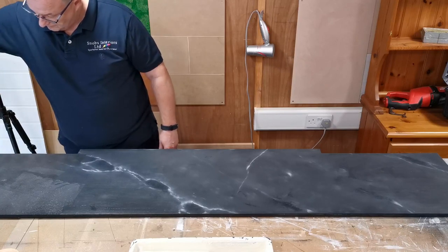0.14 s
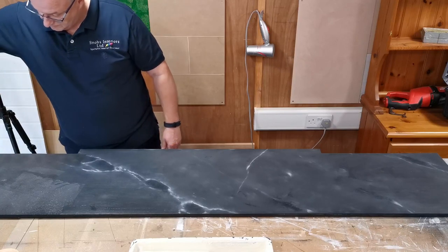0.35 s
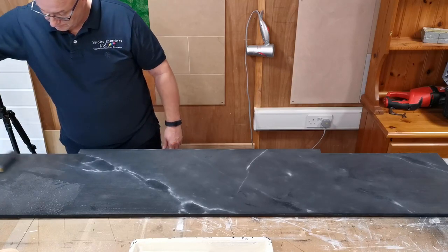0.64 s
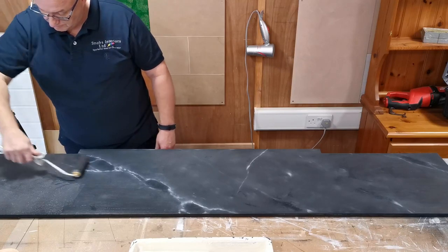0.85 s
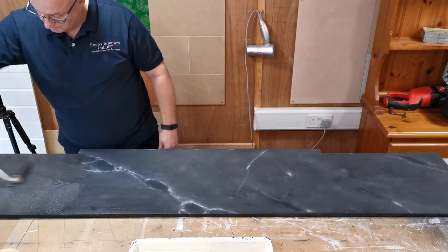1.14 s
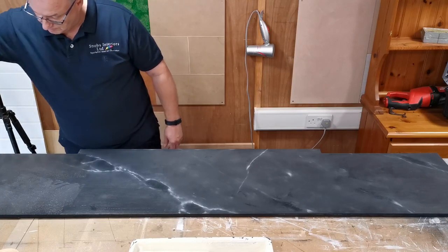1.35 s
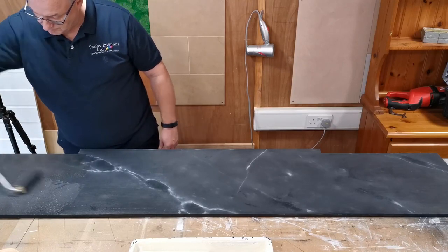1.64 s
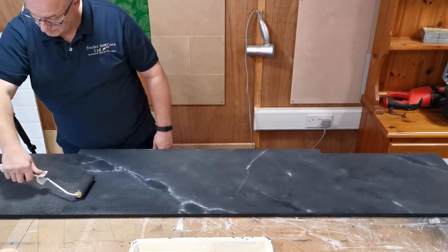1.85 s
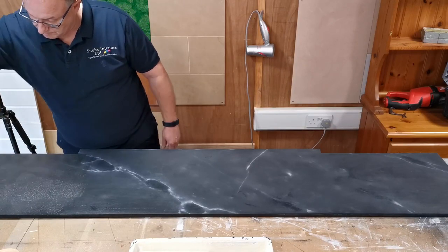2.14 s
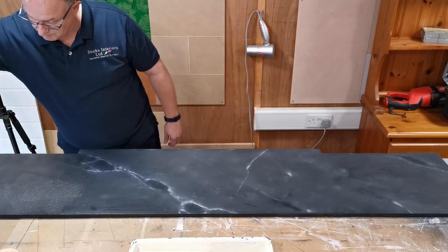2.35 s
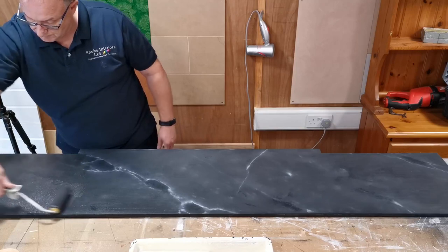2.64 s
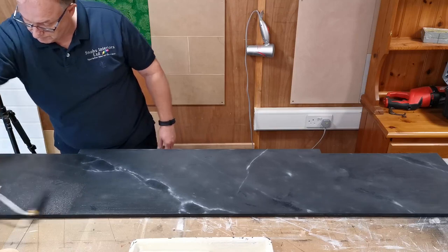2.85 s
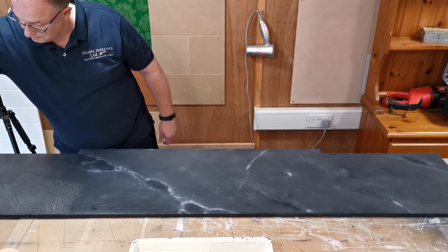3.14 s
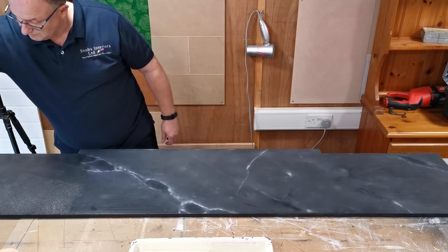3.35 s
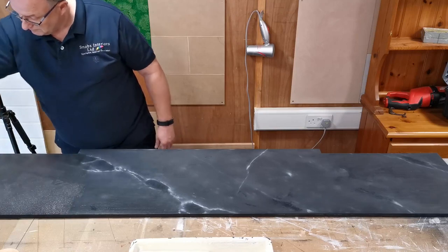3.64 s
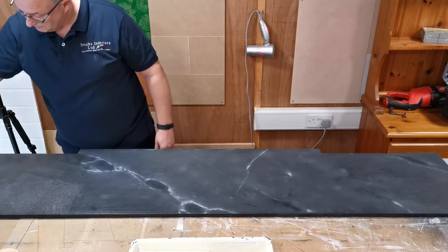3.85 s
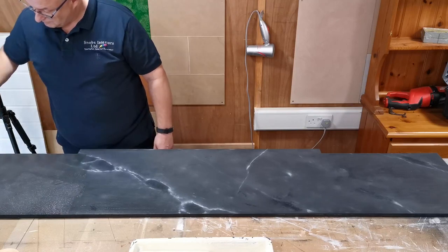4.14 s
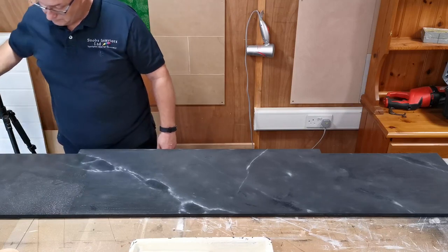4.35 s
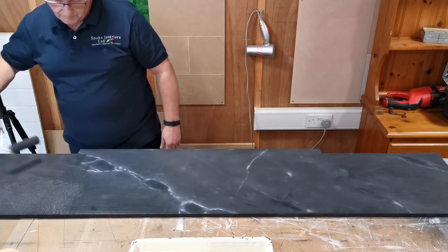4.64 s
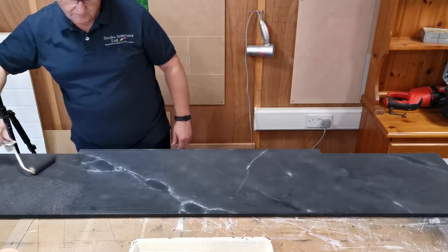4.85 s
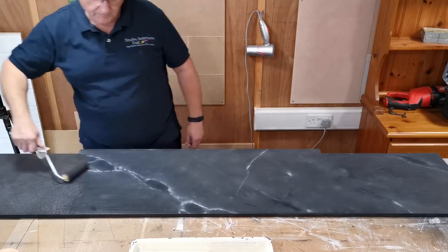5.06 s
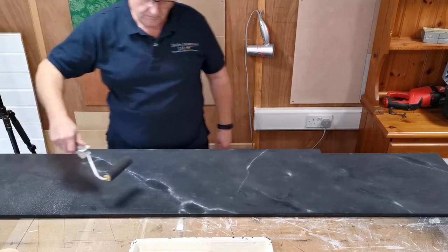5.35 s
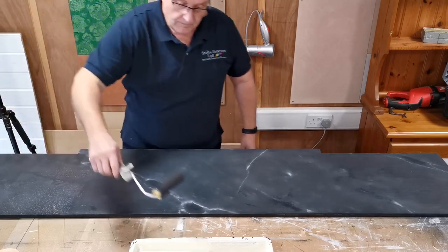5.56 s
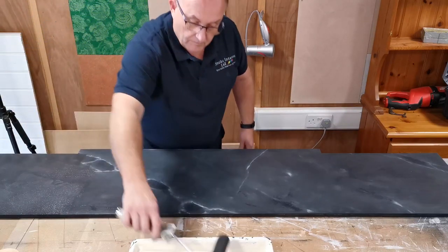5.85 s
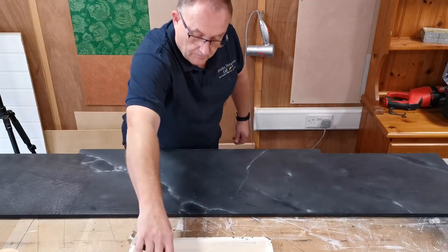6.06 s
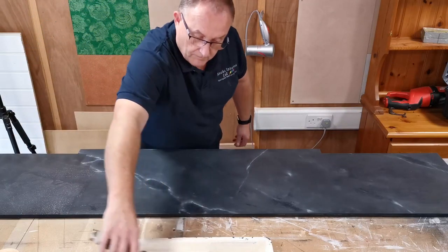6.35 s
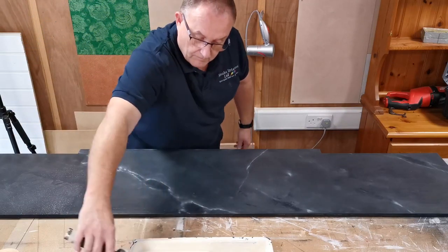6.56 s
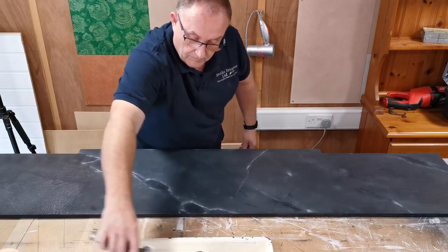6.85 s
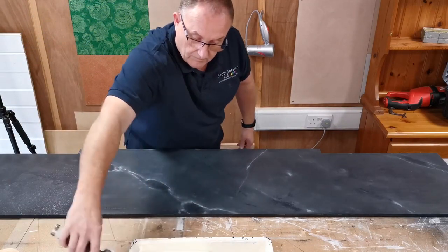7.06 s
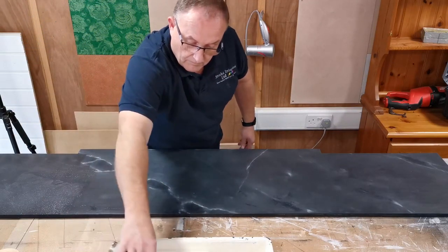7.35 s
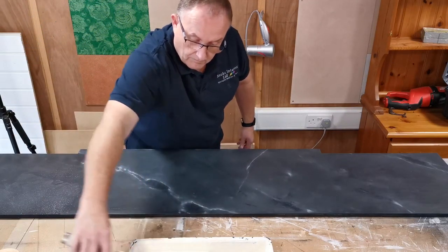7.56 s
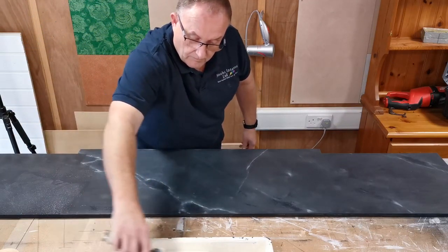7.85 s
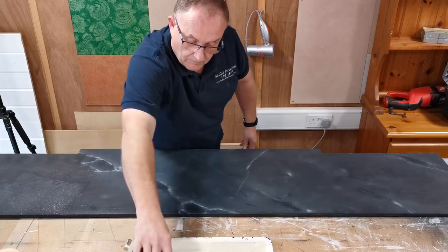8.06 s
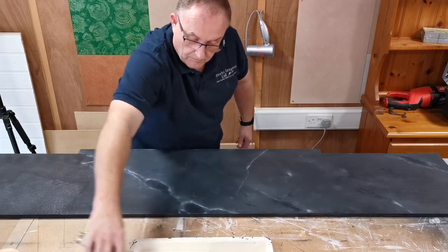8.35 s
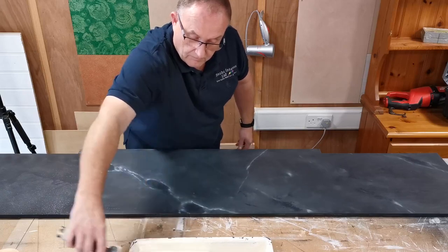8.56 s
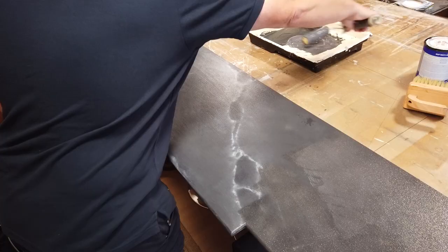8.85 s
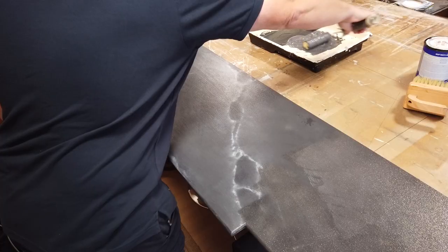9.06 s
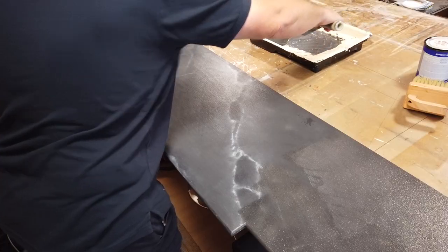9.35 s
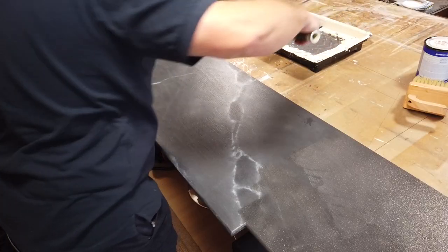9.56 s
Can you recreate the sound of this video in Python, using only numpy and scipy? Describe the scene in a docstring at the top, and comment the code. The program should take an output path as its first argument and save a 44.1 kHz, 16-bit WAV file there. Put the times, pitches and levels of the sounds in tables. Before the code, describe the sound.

Sticky, crackling roller strokes in a small workshop give way to bench thuds, hollow plastic tray knocks, and a low hum under a closer finish.

```python
"""A small foam roller runs to and fro over a board in a workshop: wet film tears as filtered random ticks.
The room hums low (noise through resonances) and the bench booms (low noise bands, decaying modes).
Later the roller is set down in a plastic tray, which scrapes (ticks) and knocks (noise cracks, struck modes).
Near the end a wavering hum starts, then a second, closer microphone takes over for the last 0.8 s:
the hum steps up, the treble peaks higher and the roller squelches (low and high tick bands)."""
import sys
import numpy as np
from scipy import signal
from scipy.fft import rfft, irfft, next_fast_len
from scipy.io import wavfile
from scipy.ndimage import uniform_filter1d

SR = 44100
rng = np.random.default_rng(int(sys.argv[2]) if len(sys.argv) > 2 else 0)


def unload_audio(sound):
    """Save the sound as a 16-bit wav file, at the path given as the first command line argument."""
    columns = np.transpose(np.atleast_2d(sound))
    # keep every value between -1 and 1, then stretch to whole-number steps
    steps = np.round(np.clip(columns, -1, 1) * 32767)
    wavfile.write(sys.argv[1], SR, steps.astype(np.int16))


N = 427329
TIME = np.arange(N) / SR
SWITCH_S = 8.893  # far microphone before, close one after
SWITCH = int(SWITCH_S * SR)
# stereo spread of diffuse room sound: hz, side_minus_mid_db
DIFFUSE_WIDTH = [(60, -12), (110, -4), (200, -22), (380, -4.5), (700, -7.5), (1290, -6), (2380, -3.5),
                 (4400, 0.5), (8120, -6.5), (15000, 5)]


def undb(db):
    """Decibels to gain."""
    return 10 ** (np.asarray(db) / 20)


def unit(x):
    """Scale to rms 1."""
    return x / np.sqrt(np.mean(x ** 2))


def colour(x, points):
    """Shape the spectrum by (hz, db) points joined on a log-frequency axis."""
    size = next_fast_len(x.shape[-1])
    hz, db = np.transpose(points)
    log_hz = np.log(np.fft.rfftfreq(size, 1 / SR) + 1)  # +1 keeps 0 Hz finite
    response = undb(np.interp(log_hz, np.log(hz), db))
    return irfft(rfft(x, size) * response, size)[..., :x.shape[-1]]


def crackle(per_second, spread_db, size):
    """Random ticks, a few larger than the rest; two rows share the ticks but not their signs."""
    chance = rng.random((4, size))
    sizes = undb(-spread_db * np.log(1 - chance[1]))
    ticks = sizes * (chance[0] < per_second / SR)
    return ticks * np.sign(chance[2:] - .5)


def walk(rate_hz):
    """Slow random wander, spread 1: noise averaged twice over 1 / rate_hz."""
    k = int(SR / rate_hz)
    return unit(uniform_filter1d(uniform_filter1d(rng.standard_normal(N), k), k))


def ring(modes, seconds):
    """Free decay of (hz, db, t60_s) modes, peak 1."""
    t = np.arange(round(seconds * SR)) / SR
    out = sum(undb(db) * np.sin(2 * np.pi * hz * t) * 1000. ** (-t / t60_s) for hz, db, t60_s in modes)
    return out / np.abs(out).max()


def struck(modes, push):
    """Modes, slightly detuned, driven by a short uneven push; peak 1."""
    detune = 1 + 0.025 * rng.standard_normal(len(modes))
    detuned = [(hz * d, db, t60_s) for (hz, db, t60_s), d in zip(modes, detune)]
    free = ring(detuned, len(push) / SR)
    out = signal.fftconvolve(free, push)[:len(free)]
    return out / np.abs(out).max()


def resonance(hz, pass_width_hz, size):
    """Noise passed twice through one resonance, rms 1."""
    b, a = signal.iirpeak(hz, hz / pass_width_hz, SR)
    once = signal.lfilter(b, a, rng.standard_normal(size))
    return unit(signal.lfilter(b, a, once))


def tail(t60_s):
    """Decaying noise of unit energy: scattered reflections."""
    t = np.arange(int(t60_s * SR)) / SR
    h = rng.standard_normal(SR)[:len(t)] * 1000. ** (-t / t60_s)
    return h / np.sqrt(np.sum(h ** 2))


def ports(pair, points, width=None):
    """Two unrelated draws become mid and side: bass is shared by the ports, treble arrives by different paths."""
    # default stereo spread: hz, side_minus_mid_db
    near_width = [(60, -24), (200, -19), (400, -15), (700, -13), (1300, -8.5), (2400, -4), (4400, 0),
                  (8000, 0), (15000, 0)]
    mid, side = unit(colour(pair, points))
    side = colour(side, near_width if width is None else width)
    return np.array([mid + side, mid - side])


def add(track, s, sound):
    """Mix a sound into a track at s seconds."""
    i = int(s * SR)
    track[..., i:i + sound.shape[-1]] += sound[..., :N - i]


def swell(peak_s, rise_s, fall_s):
    """Quarter of a cosine up to the peak and another down; returns first sample and shape."""
    i = max(int((peak_s - rise_s) * SR), 0)
    t = TIME[i:int((peak_s + fall_s) * SR)] - peak_s
    return i, np.cos(np.pi / 2 * np.where(t < 0, t / rise_s, t / fall_s))


def burst(s, attack_s, hold_s, t60_s):
    """Attack, hold and exponential release; returns first sample and shape."""
    i = int(s * SR)
    t = TIME[i:int((s + attack_s + hold_s + t60_s) * SR)] - s
    release = 1000. ** (-np.maximum(t - attack_s - hold_s, 0) / t60_s)
    return i, np.clip(t / attack_s, 0, 1) * release


def gain(shapes, levels_db, floor_db):
    """Shapes at their levels over a floor, summed as power."""
    power = np.full(N, undb(floor_db) ** 2)
    for (i, shape), db in zip(shapes, levels_db):
        power[i:i + len(shape)] += (undb(db) * shape) ** 2
    return np.sqrt(power)


def roller():
    """Paint threads snap by the thousand, louder as the roller speeds up; pressing harder adds coarser, lower tearing."""
    # spectrum of tearing paint: hz, relative_db
    film = [(350, -24.5), (600, -22.5), (840, -20), (1400, -17.5), (1600, -16), (3900, -11.5), (5000, -9),
            (6000, -5), (6700, -2), (7200, 1), (7700, -3), (8100, -9.5), (8900, -18.5), (15000, -30.5)]
    # strokes on the board, then short ones in the tray:
    # fastest_s, speeding_up_s, slowing_s, crackle_db, extra_coarse_db
    strokes = [(0.0, .1, 0.2, -37, 0), (0.26, 0.1, 0.054, -56.5, 6.5), (0.83, 0.25, 0.2, -36, 1.5),
               (1.31, 0.26, 0.21, -32, -0.5), (1.76, 0.28, .21, -33, 0.5), (2.178, 0.23, 0.25, -30.5, 0),
               (2.63, .24, 0.19, -34.5, 1.5), (3.068, .24, 0.32, -32.5, 0.5), (3.36, 0.14, 0.11, -47.5, -2),
               (4.051, .28, 0.45, -38.5, 0.5), (5.14, 0.17, 0.21, -40.5, 1.5), (5.58, 0.3, 0.29, -57, 5.5),
               (6.3, .15, 0.2, -63.5, 4), (6.53, 0.2, 0.084, -56, 4.5), (6.74, 0.16, 0.14, -55, 3),
               (7.28, 0.17, 0.22, -57, 4.5), (7.61, 0.043, 0.046, -53, 4), (7.69, 0.067, 0.062, -49.5, 4.5),
               (7.84, 0.095, 0.15, -49, 3), (8.46, 0.063, 0.16, -64.5, 9), (8.665, 0.03, 0.084, -52, 2),
               (8.76, .08, 0.095, -56.5, -4)]
    # roller pressed down, film crackles at once: start_s, attack_s, crackle_db, t60_s
    dabs = [(0.598, 0.034, -37, .3), (3.797, 0.0087, -39.5, 0.17), (4.9, 0.0078, -56.5, 1),
            (6.18, 0.007, -46.5, 0.14), (7.1, 0.0059, -44, 0.44), (7.499, 0.0098, -49.5, 0.36),
            (8.236, 0.011, -49, 0.34), (8.541, 0.0051, -47.5, 0.34)]
    dab_coarse_db = -2.5
    coarse_power = 1.12  # coarse tearing fades sooner than fine as the roller slows
    wet_film_db = -71.5  # faint ticking of fresh paint between strokes
    lift_s, lift_fade_s = 4.285, 0.011  # one stroke ends early as the roller leaves the board

    threads = crackle(7000, 1.6, size=N)
    fine = ports(threads, film) * undb(1.0 * walk(31))
    coarse = colour(fine, [(1500, 1.5), (4000, -1.5), (5500, -57)])
    lifted = np.exp(-np.maximum(TIME - lift_s, 0) / lift_fade_s)
    shapes = [swell(*row[:3]) for row in strokes]
    shapes += [burst(s, attack_s, 0, t60_s) for s, attack_s, _, t60_s in dabs]
    shapes = [(i, shape * lifted[i:i + len(shape)] if i < lift_s * SR else shape) for i, shape in shapes]
    db = np.array([row[3] for row in strokes] + [row[2] for row in dabs])
    coarse_db = np.array([row[4] for row in strokes] + [dab_coarse_db] * len(dabs))
    fine_level = gain(shapes, db, wet_film_db)
    coarse_shapes = [(i, np.abs(shape) ** coarse_power) for i, shape in shapes]
    coarse_level = gain(coarse_shapes, db + coarse_db, wet_film_db)
    # the coarse band moves from the fine level to its own
    return (TIME < SWITCH_S) * (fine_level * fine + (coarse_level - fine_level) * coarse)


def shop():
    """Soft air noise and a few low room resonances; the close microphone hears a thinner room."""
    # air noise at each microphone: hz, relative_db
    far_air = [(160, -9), (280, -4.5), (567, -4.5), (627, -3.5), (767, -5), (1270, -8.5), (1500, -9.5),
               (4180, -19.5), (7160, -27.5), (15500, -43.5)]
    close_air = [(59, -32), (100, -11.5), (219, -21.5), (543, -23.5), (847, -29), (1020, -22.5),
                 (1470, -33), (2020, -32), (2190, -32.5), (3970, -45.5), (15700, -44)]
    # room resonances: hz, width_hz (per filter pass), level_db
    room_modes = [(94, 76, -60), (167.6, 23.5, -60.5), (242.1, 16.5, -61), (290.8, 35, -67.5)]
    far_db, close_db = -58, -55.5

    air = ports(rng.standard_normal((2, N)), far_air, DIFFUSE_WIDTH) * undb(far_db + 1.0 * walk(1.3))
    mid, side = [sum(undb(db) * resonance(1. * hz, 1. * width_hz, size=N) for hz, width_hz, db in room_modes)
                 for _ in range(2)]
    out = air + mid + undb(-8.0) * side * np.array([[1], [-1]])
    out[:, SWITCH:] = ports(rng.standard_normal((2, N - SWITCH)), close_air) * undb(close_db)
    return out


def bench():
    """Thuds ring the bench's modes; bass booms and rumbles, swelling as weight shifts on bench and floor."""
    # bass swells: loudest_s, rise_s, fall_s, boom_db, deep_rumble_db
    swells = [(0.45, .25, 0.3, -58, -47.5), (0.65, 0.083, 0.12, -50, -47), (1.8, 0.37, .3, -58, -57),
              (2.72, 0.22, 0.44, -53.5, -60), (3.86, 0.09, 0.16, -41, -38.5), (5.0, .15, 0.17, -44, -54),
              (5.28, 0.29, 0.22, -39, -60), (5.75, 0.098, 0.21, -33.5, -49),
              (6.1, 0.075, 0.47, -42.5, -33.5), (6.599, 0.18, 0.33, -51, -44), (7.18, .15, 0.1, -48.5, -57),
              (8.39, 0.57, 0.19, -60.5, -51), (8.96, 0.13, .15, -53, -40), (9.18, 0.062, 0.25, -36, -33),
              (9.5, 0.32, 0.22, -42.5, -31)]
    # heavy thuds: start_s, level_db, hand_damping (divides t60), extra_upper_modes_db
    thuds = [(3.803, -13.5, 1.27, -15), (3.859, -31, 2, 5), (5.203, -30, 2.2, 4), (5.7, -27, 1, 3),
             (5.744, -19.5, 1.9, -3), (5.849, -35, 1.2, 14), (6.075, -30, 0.93, 8), (6.246, -41, 2.2, 0),
             (7.109, -16.5, 1.8, 16), (8.241, -34, 0.91, 10), (9.166, -20, 2.9, 18)]
    # bench modes: hz, relative_db, undamped_t60_s
    bench_modes = [(80.2, 5, 0.39), (62.5, -6, 0.61), (109.6, -21.5, 0.54), (177, -10, 0.16),
                   (243, -24, .1)]
    boom_hz, boom_pass_width_hz = 61.7, 37.8
    boom_floor_db, deep_floor_db = -55.5, -56  # between the swells
    lead_s = 0.0001  # bass reaches each port this far off the mean time

    out, t = np.zeros(N), np.arange(SR // 2) / SR
    for s, db, damping, upper_db in thuds:
        modes = [(hz, mode_db + upper_db * (hz > 100), t60_s / max(damping, .5))
                 for hz, mode_db, t60_s in bench_modes]
        add(out, s, undb(db) * ring(modes, .5) * (1 - np.exp(-t / 0.0049)))
    boom = resonance(boom_hz, boom_pass_width_hz, size=N) * undb(2.2 * walk(5))
    deep = unit(colour(rng.standard_normal(N), [(8, -32), (20, 4), (36, 9.5), (52, -17), (200, -61)]))
    shapes = [swell(*row[:3]) for row in swells]
    boom_db, deep_db = np.array(swells)[:, 3:].T
    out = out + gain(shapes, boom_db, boom_floor_db) * boom + gain(shapes, deep_db, deep_floor_db) * deep
    # adding the slope shifts the bass slightly in time
    return out + lead_s * SR * np.gradient(out) * np.array([[1], [-1]])


def scrape():
    """Plastic ribs of the tray stick and slip on the rough bench top."""
    # spectrum of the slips: hz, relative_db
    slip_points = [(90, -15), (160, 2.5), (300, -9), (440, -4), (620, -11.5), (1060, -11.5), (1400, -8.5),
                   (3100, -9), (4200, -16), (6000, -17), (7300, -14), (8000, -20.5), (8900, -33.5),
                   (15000, -53.5)]
    # slides: start_s, sliding_s, level_db, t60_s, brightness_db
    slides = [(3.44, 0.026, -55.5, 0.17, -8), (5.233, 0.084, -39, 0.21, 2.5), (5.5, 0.079, -53, .15, -1),
              (5.726, .03, -38.5, .3, -4), (5.795, 0.075, -26.5, 0.38, 2.5), (5.9, 0.033, -29.5, 0.34, 6),
              (6.044, 0.018, -33.5, .22, 4.5), (6.19, .1, -61.5, .2, 2), (7.387, 0.025, -49.5, 0.28, 8)]
    attack_s = 0.007

    slips = ports(crackle(6000, 2.0, size=N), slip_points) * undb(2.0 * walk(83))
    bright = colour(slips, [(2500, -18), (4500, -13), (9000, -2)])
    shapes = [burst(s, attack_s, hold_s, t60_s) for s, hold_s, _, t60_s, _ in slides]
    db, bright_db = np.array(slides)[:, [2, 4]].T
    level = gain(shapes, db, -np.inf)
    bright_level = gain(shapes, db + bright_db, -np.inf)
    return level * slips + (bright_level - level) * bright


def knocks():
    """A crack that rattles away, and the ring of the tray's body and walls."""
    # start_s, low_crack_db, high_crack_db, hollow_ring_db, wall_ring_db, rattle_t60_s
    hits = [(3.7964, -39, -44, -49, -52, 0.16), (4.3501, -28.5, -34, -63, -39, 0.13),
            (4.369, -35.5, -38.5, -60, -59, 0.24), (4.902, -46, -55, -64, -47.5, 0.38),
            (5.2048, -33, -37, -51, -54, 0.42), (5.24, -30.5, -35, -38, -50, .3),
            (5.2797, -36, -40, -57, -59, 0.51), (5.592, -47.5, -60, -41.5, -50, 0.17),
            (5.7344, -24, -25, -37, -52, 0.22), (5.7984, -15.5, -27, -45, -29, 0.22),
            (5.8057, -11.5, -40, -53, -20, 0.22), (5.8489, -29, -23, -24.5, -20, .15),
            (5.887, -7.5, -18, -49, -40, 0.096), (5.9355, -12.5, -18.5, -30, -45, .17),
            (6.047, -25, -42, -37, -35, 0.17), (6.0534, -16.5, -28, -51, -57.5, .23),
            (6.1885, -56, -45, -43, -39.5, 0.11), (7.1071, -40, -48, -22, -38, .11),
            (7.1264, -44, -54, -30, -42, 0.41), (7.503, -55, -47, -68, -50, .15),
            (7.9779, -34, -57, -52, -31, .36), (7.998, -34, -63, -64, -37.5, 0.18),
            (8.0516, -30.5, -35, -45, -43, .21), (8.2305, -37, -44, -40, -35, .29),
            (8.2381, -22.5, -42.5, -18, -19.5, 0.24), (8.54, -53, -61, -58, -46, .2),
            (8.8252, -42.5, -71, -48, -48, .3), (9.1363, -37, -40, -40, -37, 0.11),
            (9.149, -38, -40, -32.5, -40, 0.17), (9.3234, -43, -42.5, -65, -67, 0.23),
            (9.374, -39.5, -53, -60, -50, 0.49), (9.4108, -27, -40, -42, -46, 0.29),
            (9.427, -23.5, -23, -47, -48, 0.14), (9.437, -12, -21, -47, -28, 0.17),
            (9.515, -28, -41, -57, -51, 0.22)]
    # tray modes, hollow body and thin walls: nominal_hz, relative_db, t60_s
    hollow_modes = [(445, -11, 0.11), (525, -20, .07), (562, 7.5, 0.083), (610, 5.5, 0.1), (706, -6, 0.047)]
    wall_modes = [(724, 5, 0.16), (880, -39.5, 0.15), (1083, 6, 0.16), (1126, 10.5, 0.11), (1338, 0, 0.11),
                  (1525, -4, 0.081), (1895, -0.5, 0.099), (2226, -17, 0.041), (2480, -20, 0.071),
                  (3260, -25, .06)]
    # high crack at each microphone: hz, relative_db
    high_far = [(3000, -50), (4500, 6.5), (7200, 8.5), (9000, -45), (15000, -45)]
    high_close = [(3000, -38), (4500, 5), (7000, -8), (10200, 5), (12000, -2), (15700, 2)]
    contact_ms = 8.8
    crack_top_hz, top_hz_per_db = 3700, 58  # low crack reaches higher beside a strong high crack
    far_pan_db = 2  # left minus right at the far microphone

    out, t = np.zeros((2, N)), np.arange(int(.3 * SR)) / SR
    contact = 1000 * t / contact_ms
    tap = 40 * (np.arange(len(t)) == 40)
    for s, low_db, high_db, hollow_db, wall_db, t60_s in hits:
        grit = rng.standard_normal((2, len(t)))
        high = ports(grit, high_far if s < SWITCH_S else high_close)
        top_hz = max(crack_top_hz + top_hz_per_db * (high_db - low_db), 1200)
        low = ports(grit, [(350, -28), (800, 0), (top_hz, 0), (1.56 * top_hz, -16), (2 * top_hz, -40)])
        rattle = undb(low_db) * low + undb(high_db) * high
        shape = 0.052 * np.exp(-t / 0.0038) + 0.27 * 1000. ** (-t / max(t60_s, .02))
        # one firm tap in a gritty contact that builds, then eases
        push = (grit[0] + tap) * np.sqrt(contact) * np.exp(-1.5 * contact)
        tray = undb(hollow_db) * struck(hollow_modes, push) + undb(wall_db) * struck(wall_modes, push)
        tray = colour(tray, [(250, -28), (420, -0.5)])  # the tray's ring is cut below about 300 Hz
        pan_db = far_pan_db * (s < SWITCH_S)
        pan = undb(np.array([[pan_db], [-pan_db]]) / 2)
        add(out, s, (rattle * shape + 1.08 * tray) * pan)
    return out


def hum():
    """A near sine of wavering pitch and level; it starts with a brief surge and steps up, at a trough, at the switch."""
    start_s, mean_hz, far_db, close_db = 8.24, 56.9, -45.5, -31
    surge_db, surge_t60_s = -31, 0.18

    turns = np.cumsum(mean_hz * (1 + 0.019 * walk(17))) / SR
    throb = undb(2.2 * walk(30))
    fade_in = np.clip((TIME - start_s) / .03, 0, 1)
    steady = fade_in * undb(np.where(TIME < SWITCH_S, far_db, close_db))
    surge = gain([burst(start_s, 0.024, 0, surge_t60_s)], [surge_db], -np.inf)
    wave = -np.sqrt(2) * np.cos(2 * np.pi * (turns - turns[SWITCH]))
    return np.hypot(steady, surge) * throb * wave


def wade():
    """Close up, the roller wades in the tray: it squelches low and hisses stickily in the treble."""
    # squelch and sticky treble spectra: hz, relative_db
    squelch_points = [(71, -28), (120, 5), (162, -20), (255, -0.5), (299, -16), (357, -4), (2300, -12),
                      (2740, -11), (8000, -26.5), (10400, -67), (17600, -120)]
    treble_points = [(4000, -40), (6000, -22), (8500, -3), (9700, 4), (10300, 11.5), (11200, -1),
                     (13000, 1), (15800, -8)]
    # start_s, hold_s, t60_s, squelch_db, sticky_treble_db
    wades = [(9.127, .01, .4, -45, -51.5), (9.13, 0.48, 0.76, -60, -60.5), (9.366, .05, .2, -48.5, -66),
             (9.417, .02, 0.089, -47, -31), (9.429, 0.0057, 0.31, -25.5, -45),
             (9.501, 0.0053, 0.088, -44, -36.5)]
    attack_s = 0.014

    squelch = ports(crackle(5000, 2.0, size=N - SWITCH), squelch_points)
    treble = ports(crackle(9000, 2.0, size=N - SWITCH), treble_points)
    shapes = [burst(s, attack_s, hold_s, t60_s) for s, hold_s, t60_s, _, _ in wades]
    squelch_db, treble_db = np.array(wades)[:, 3:].T
    out = np.zeros((2, N))
    out[:, SWITCH:] += gain(shapes, squelch_db, -np.inf)[SWITCH:] * squelch
    out[:, SWITCH:] += gain(shapes, treble_db, -np.inf)[SWITCH:] * treble
    return out


def scene():
    """Hand sounds, the roller left of centre, with the walls' answer, over bench, room, hum and wading."""
    room_t60_s, room_db = 0.35, -9
    hand = roller() * undb(np.array([[1.2], [-1.2]])) + scrape() + knocks()
    walls = np.array([tail(room_t60_s), tail(room_t60_s)])
    mid, side = signal.oaconvolve(hand.mean(axis=0, keepdims=True), walls, axes=1)[:, :N]
    side = colour(side, DIFFUSE_WIDTH)
    echo = undb(room_db) * np.array([mid + side, mid - side])
    return hand + echo + shop() + bench() + hum() + wade()


def record(dry):
    """Each microphone has its own steep top cut."""
    far_top_hz, close_top_hz = 15050, 15750
    cut = [signal.sosfilt(signal.ellip(16, .2, 80, hz, fs=SR, output="sos"), dry)
           for hz in (far_top_hz, close_top_hz)]
    return np.where(TIME < SWITCH_S, *cut)


dry = scene()
out = record(dry)
unload_audio(out)
```